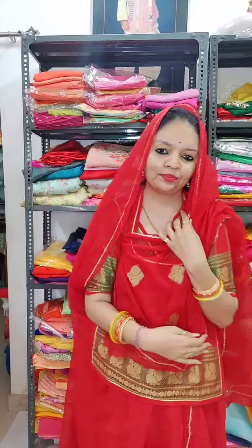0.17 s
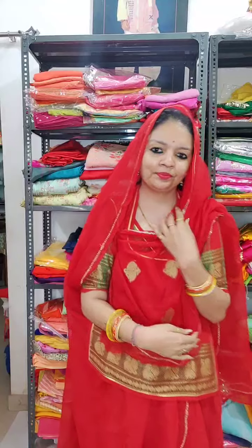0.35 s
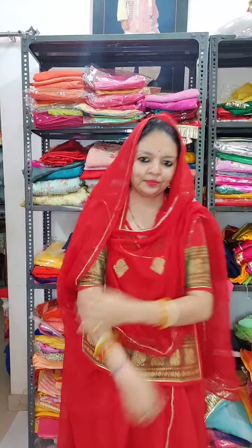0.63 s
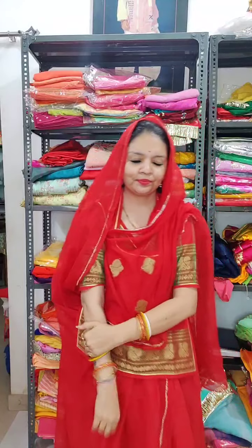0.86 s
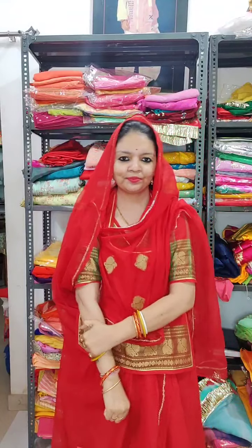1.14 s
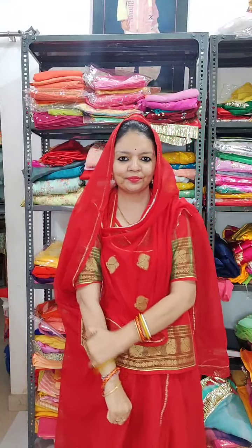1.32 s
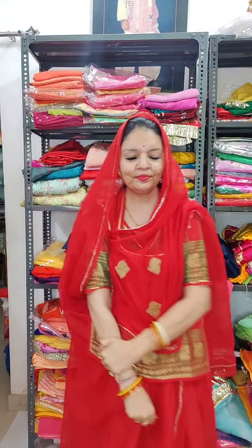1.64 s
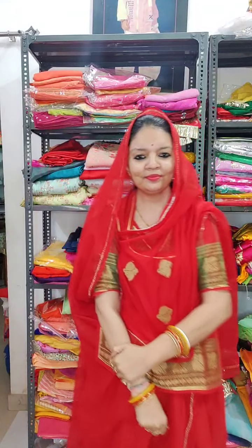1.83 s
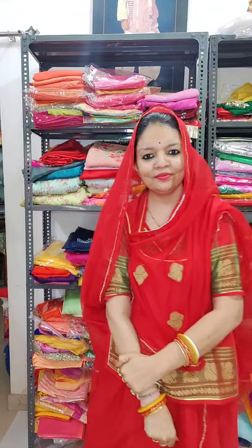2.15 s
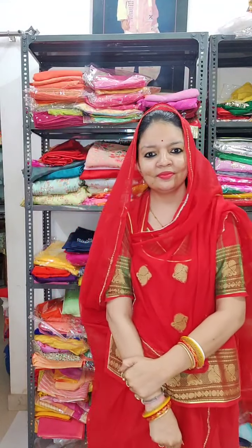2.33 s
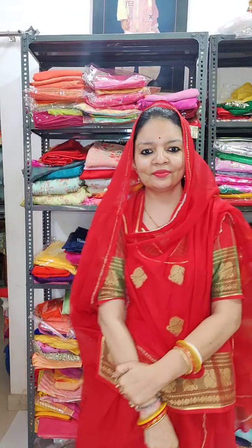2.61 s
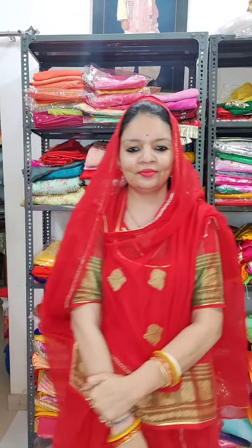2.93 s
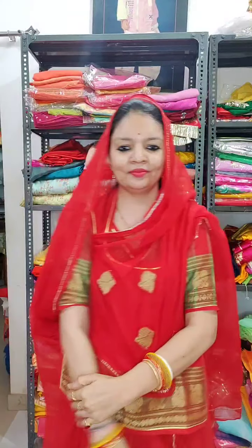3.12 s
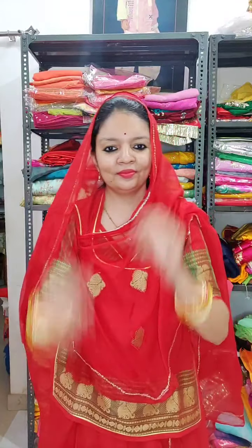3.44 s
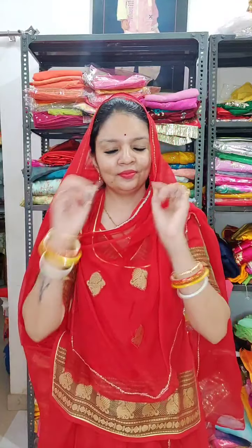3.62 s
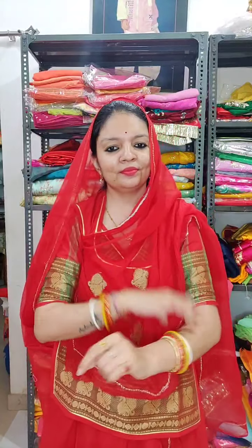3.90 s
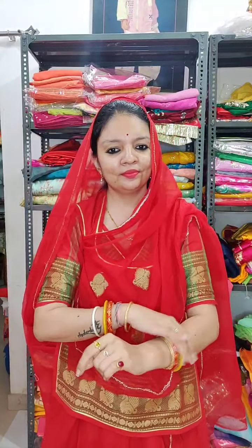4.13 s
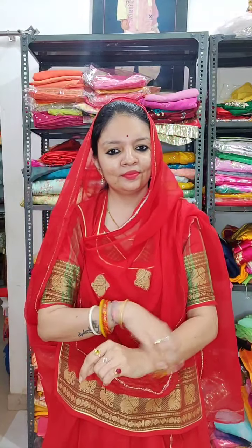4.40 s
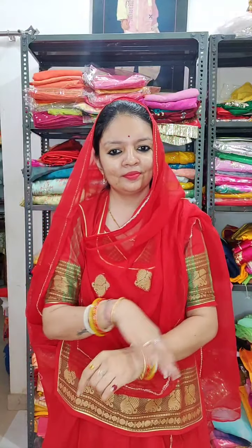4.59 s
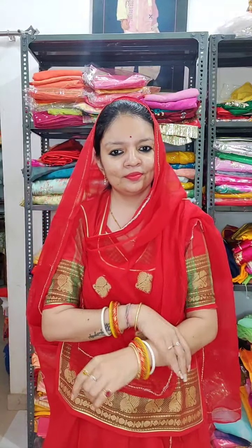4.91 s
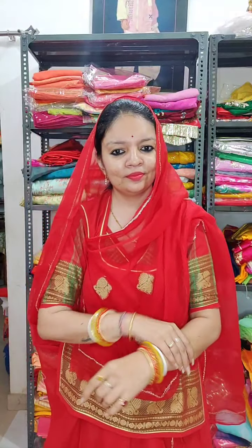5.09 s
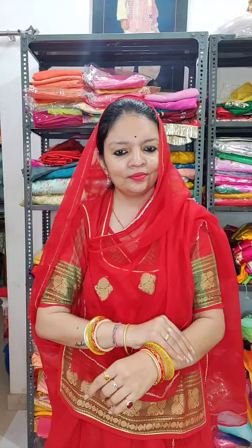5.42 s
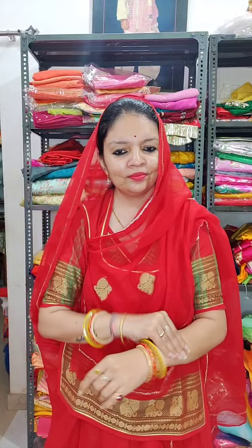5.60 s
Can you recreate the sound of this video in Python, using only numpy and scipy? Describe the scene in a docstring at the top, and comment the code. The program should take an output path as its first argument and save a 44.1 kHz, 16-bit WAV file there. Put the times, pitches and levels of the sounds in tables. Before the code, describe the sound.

Stacked bangles clink in short, bright, scattered clicks on moving wrists, over a low electrical hum and faint cloth rustle in a small shop.

```python
"""Air, a faint rustle of clothes and a motor's steady hum fade in as the input opens, in a small shop
lined with shelves of cloth. The hum is built from sine tones that waver slightly.
Then stacked bangles knock together on moving wrists. The arm damps each bangle, so a knock is a bright
ring of a few milliseconds, made of short decaying modes, followed by the short echo of the room.
Air and cloth are shaped noise that grows as the arms move."""
import sys
import numpy as np
from scipy import signal
from scipy.fft import rfft, irfft
from scipy.io import wavfile

SR = 44100
rng = np.random.default_rng(int(sys.argv[2]) if len(sys.argv) > 2 else 0)


def wav_out(sig):
    """Save sig, one row per channel (or a flat mono array), as 16-bit PCM at SR to the path in sys.argv[1]."""
    wavfile.write(sys.argv[1], SR, np.round(np.clip(np.atleast_2d(sig).T, -1, 1) * 32767).astype(np.int16))


N = 253575  # length [samples]

# bangle knocks: (time [s], strength [dB], main ring [Hz],
# extra ring of the middle modes [dB], extra ring of the high modes [dB])
KNOCKS = [(0.5291, -40, 8070, 4, 4.5), (0.7103, -45.5, 8150, -3, 2), (0.7656, -27.5, 8300, 3, 5),
          (0.779, -36.5, 7450, 3, 1), (0.8488, -19, 7960, -8, -7), (0.893, -13, 8090, -22, -23),
          (0.9052, -26.5, 7980, -3, 7), (1.3933, -12, 8220, 8.5, 4), (1.3949, -14, 8160, 10, 3.5),
          (1.406, -13.5, 7940, -4, -2), (1.4589, -10.5, 8210, -12, -4.5), (1.491, -22.5, 8000, 4, -4),
          (1.5433, -19.5, 7820, 6.5, 0.5), (2.1383, -51.5, 8230, -2, 1.5), (3.1463, -32.5, 8240, 6.5, 6.5),
          (3.2152, -41.5, 7470, 7, 2), (3.4747, -19, 7750, 6.5, 1), (3.6003, -36.5, 7300, 3, -3),
          (3.686, -43.5, 7940, 6, -10), (3.8178, -24, 7930, 6, 1.5), (3.8301, -29, 7700, -8, -4),
          (4.0272, -45, 7400, 5, -7), (4.0815, -19, 7700, 10.5, 9), (4.0992, -23.5, 8330, 6, -8),
          (4.1115, -28.5, 7700, -7, -4), (4.357, -36, 8130, -6, -12), (4.3762, -38.5, 8100, 0, -1),
          (4.4676, -23, 7870, -4, -7.5), (4.5151, -31.5, 7540, 5, -5), (4.8725, -32.5, 8080, 4.5, 10),
          (5.098, -21.5, 7730, -9, -8.5), (5.243, -25, 8050, 0.5, 6.5), (5.4037, -37.5, 8100, 5, 10),
          (5.6698, -42.5, 7900, 8, 2)]
MEDIUM_DB = -25  # strength of a medium knock


def gain_of(db):
    """Decibels to amplitude."""
    return 10 ** (np.asarray(db) / 20)


def evened(x):
    """Scales to an rms of 1."""
    return x / np.sqrt(np.mean(x ** 2) + 1e-20)


def read(points, hz):
    """Reads a spectrum table on a log-frequency axis."""
    f, value = np.transpose(points)
    return np.interp(np.log(hz + 1), np.log(f + 1), value)


def add(mix, s, sound):
    """Mixes a sound in at time s."""
    part = mix[round(s * SR):][:len(sound)]
    part += sound[:len(part)]


def scatter():
    """One random number between -1 and 1."""
    return 2 * rng.random() - 1


def noise(spectrum):
    """Noise of rms 1 with the given spectrum."""
    hz = np.fft.rfftfreq(N, 1 / SR)
    shaped = rfft(rng.standard_normal(N)) * gain_of(read(spectrum, hz))
    return evened(irfft(shaped, N))


def drift(rate_hz):
    """Random wander of rms 1, mostly slower than rate_hz."""
    hz = np.fft.rfftfreq(N, 1 / SR)
    slow = (hz > 0) / (1 + (hz / rate_hz) ** 4)
    return evened(irfft(rfft(rng.standard_normal(N)) * slow, N))


def bump(s, half_s):
    """A smooth swell of height 1 around time s."""
    return np.exp(-((np.arange(N) / SR - s) / half_s) ** 2)


def opening(depth_db, start_s, full_s):
    """Gain of a background layer while the input opens: it rises from depth_db to 0 dB."""
    return gain_of(np.interp(np.arange(N) / SR, [start_s, full_s], [depth_db, 0]))


def air(still_db=-63.5):
    """Dull wash of moving air in the room, a little stronger while the arms sweep."""
    # room air: (frequency [Hz], relative level per Hz [dB])
    air_spectrum = [(20, -4), (45, -2), (64, -1.5), (85, -2), (130, -8), (250, -3.5), (390, -6.5),
                    (520, -13), (720, -12.5), (1000, -18), (1500, -21.5), (2300, -29.5), (5000, -35.5),
                    (14000, -35.5)]
    # brisk sweeps of the arms stir the air: (time [s], half length [s], level [dB])
    arm_sweeps = [(0.874, 0.24, -63.5), (1.5, 0.25, -66.5), (4.35, 0.46, -68.5)]
    stirred = sum(gain_of(db) * bump(s, half_s) for s, half_s, db in arm_sweeps)
    level = np.hypot(gain_of(still_db), stirred)
    return level * opening(depth_db=-8.0, start_s=0.14, full_s=0.49) * noise(air_spectrum)


def movement(half_s=0.29, per_db=0.3982):
    """The arms move around every knock, farther for a harder one; a lone medium knock peaks at 1."""
    power = 0
    for s, db, *_ in KNOCKS:
        size = gain_of(per_db * (db - MEDIUM_DB))
        power = power + (size * bump(s, half_s)) ** 2
    return np.sqrt(power)


def cloth(still_db=-75.0, stirred_db=-82.0, grain_db=1.0):
    """Fabric slides as the body sways: a fine, slightly uneven hiss that grows with each arm move and swish."""
    # rubbing cloth and faint hiss, with the microphone's resonance near 8 kHz:
    # (frequency [Hz], relative level per Hz [dB])
    hiss_spectrum = [(500, -20.5), (2000, -9), (4500, -11.5), (6300, -8), (7300, -2.5), (8100, 3.5),
                     (8900, -2.5), (9400, -1), (9800, -9), (11500, -18), (14000, -16.5)]
    # the veil and sleeves brush past: (time [s], half length [s], level [dB])
    fabric_swishes = [(0.347, 0.098, -70.5), (1.923, 0.11, -65), (4.7, 0.088, -75)]
    swishes = sum(gain_of(db) * bump(s, half_s) for s, half_s, db in fabric_swishes)
    moved = gain_of(stirred_db) * movement()
    rub = np.sqrt(gain_of(still_db) ** 2 + moved ** 2 + swishes ** 2)
    rub = rub * opening(depth_db=-6.0, start_s=0.18, full_s=0.22)
    grain = gain_of(grain_db * drift(60.0))
    return rub * grain * noise(hiss_spectrum)


def motor(waver_db=0.5, slip_turns=0.01204, start_s=0.16, fade_s=0.032):
    """Hum of a motor turning just under mains speed, with a few faint whines; it fades in as the input opens."""
    # steady tones of the motor: (frequency [Hz], rms level [dB])
    motor_tones = [(48.4, -53.5), (96.9, -68.5), (145.3, -87.5), (177.6, -86), (301.5, -81.5),
                   (484.5, -83.5), (532.9, -95), (1400, -87)]
    # two close tones near twice the mains rate that beat with it: (frequency [Hz], rms level [dB])
    beating_tones = [(98.0, -77), (100.0, -76)]
    t = np.arange(N) / SR
    tones = np.zeros(N)
    for hz, db in [*motor_tones, *beating_tones]:
        turns = hz * t + rng.random() + slip_turns * drift(1.5)
        level = gain_of(db + waver_db * drift(3.9))
        tones += level * np.sqrt(2) * np.sin(2 * np.pi * turns)
    return tones * (1 - np.exp(-np.maximum(t - start_s, 0) / fade_s))


def ring(hz, rise_s):
    """A heavily damped mode: swells for a few cycles and dies within milliseconds."""
    t = np.arange(SR // 80) / SR
    envelope = t / rise_s * np.exp(1 - t / rise_s)
    return envelope * np.sin(2 * np.pi * (hz * t + rng.random()))


def knock(modes, main_hz, shares_db, main_db=-8.5, main_rise_s=0.00043, detune=0.012):
    """One bangle strikes another: a main ring plus low, middle and high modes, with a peak of 1."""
    sound = gain_of(main_db) * ring(main_hz, main_rise_s)
    for hz, db, rise_s in modes:
        group = np.searchsorted([6000, 8000], hz)  # 0 low, 1 middle, 2 high
        mode = ring(hz * (1 + detune * scatter()), rise_s)
        sound += gain_of(shares_db[group] + db) * mode
    return sound / abs(signal.hilbert(sound)).max()


def rattles(gap_s=0.009, main_hz=8050, clang_db=-3, spread_db=4):
    """The stack slides and jostles in tiny contacts at uneven intervals, as rows like those of the knocks."""
    # bouts of jostling: (start [s], length [s], strength [dB])
    jostles = [(0.746, 0.05, -39.5), (1.399, 0.1, -32), (1.532, 0.045, -29.5), (3.582, 0.06, -47.5),
               (4.346, 0.11, -48.5)]
    rows = []
    for start_s, length_s, db in jostles:
        for k, (late, size) in enumerate(rng.uniform(-1.1, 1, size=(20, 2))):
            if k * gap_s < length_s:
                s = start_s + (k + late / 2) * gap_s
                rows.append((s, db + spread_db * size, main_hz, clang_db, clang_db))
    return rows


def shop(send_db, build_s=0.0069, wander=0.19):
    """The paths from one wrist position: direct sound, a few near echoes, then a diffuse tail."""
    # echoes off the arm, the body and the nearest shelf: (delay [s], level [dB])
    near_echoes = [(.0011, -18), (.0032, -12.5), (.0073, -13), (.0086, -23), (0.0124, -22)]
    # time for the tail to fall by 60 dB: (frequency [Hz], time [s])
    room_t60 = [(1500, 0.34), (4000, 0.22), (8000, 0.24), (10500, 0.21), (14000, 0.16)]
    # tone of the tail: (frequency [Hz], relative level [dB])
    room_colour = [(1500, 4), (4000, 2), (6500, 1.5), (8000, -2.5), (10000, 0), (12000, 6.5), (14000, 1.5)]
    size = SR // 2
    # sparse random reflections, about 3000 a second
    taps = rng.standard_normal(size) * (rng.random(size) < 3000 / SR)
    hz, t, z = signal.stft(taps, SR, nperseg=256)
    decay_db = 60 * t / read(room_t60, hz)[:, None]
    z *= gain_of(read(room_colour, hz)[:, None] - decay_db)
    tail = signal.istft(z, SR, nperseg=256)[1][:size]
    tail *= 1 - np.exp(-(np.arange(size) / SR / build_s) ** 2)  # reflections need time to gather
    paths = gain_of(send_db) * tail / np.linalg.norm(tail)
    paths[0] += 1  # direct sound
    for delay_s, db in near_echoes:
        add(paths, delay_s * (1 + wander * scatter()), gain_of([db]))
    return paths


def bangles(travel_s=0.0008, rebound_s=0.0019, rebound_db=-9, rebound_spread_db=0.5, arms_lift_s=3.0):
    """Each knock rebounds once, and reaches the microphone by its own paths, since the arms keep moving."""
    # other modes of the stack hanging at the wrist: (frequency [Hz], level [dB], time to the top [s])
    wrist_modes = [(1640, -11, .00015), (2600, -15, 0.00016), (3860, -16, 0.00036), (4320, 1, 0.00028),
                   (5250, -5, 0.00039), (5780, -5, .0005), (6935, -5, 0.00078), (10050, -4, 0.00051),
                   (11600, -10, 0.00021), (13800, -14.5, 0.00059)]
    # and once the arms lift and it slides along the forearm: (frequency [Hz], level [dB], time to the top [s])
    forearm_modes = [(2000, -5, 0.00015), (3666, -1.5, 0.00042), (4330, -7.5, 0.00077),
                     (5080, 3.5, 0.00019), (6640, 2, 0.00023), (6990, -5.5, 0.00018), (9530, -0.5, 0.00025),
                     (10110, -6.5, 0.00054), (12200, -13.5, 0.00032), (12900, -12, 0.00031)]
    # a hard knock rings mostly in its main mode, a soft one is duller; rows for low, middle, high modes:
    # (share at a medium knock [dB], change per dB of strength [dB])
    mode_groups = [(-27.0, -0.2766), (-19, -0.18), (-16.5, -0.1)]
    share_db, slope = np.transpose(mode_groups)
    out = np.zeros(N)
    for s, db, main_hz, middle_db, high_db in [*KNOCKS, *rattles()]:
        if s < arms_lift_s:
            modes, send_db = wrist_modes, -2
        else:
            modes, send_db = forearm_modes, -4  # lifted arms are heard more directly
        shares_db = share_db + slope * (db - MEDIUM_DB) + [0, middle_db, high_db]
        sound = knock(modes, main_hz, shares_db)
        rebound_gain = gain_of(rebound_db + rebound_spread_db * scatter())
        rebound = rebound_gain * knock(modes, main_hz, shares_db)
        add(sound, rebound_s * (1 + 0.15 * scatter()), rebound)
        in_shop = signal.fftconvolve(sound, shop(send_db))
        add(out, s + travel_s, gain_of(db) * in_shop)
    return out


def scene():
    """All sources at one microphone."""
    return (air() + cloth() + motor() + bangles())[None]


def record(dry, open_s=0.043, edge_hz=14050):
    """The input opens with a short fade, then a steep low-pass filter limits the treble."""
    fade = np.minimum(np.arange(N) / SR / open_s, 1) ** 2
    low_pass = signal.firwin(301, edge_hz, window=("kaiser", 8), fs=SR)
    return signal.oaconvolve(dry * fade, low_pass[None], "same")


dry = scene()
out = record(dry)
wav_out(out)
```